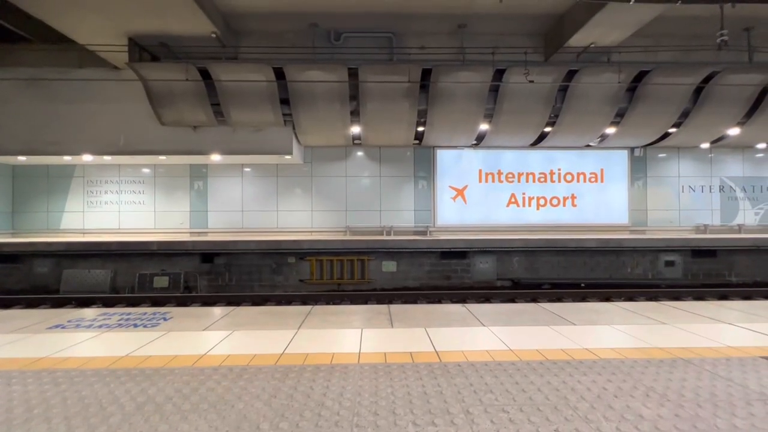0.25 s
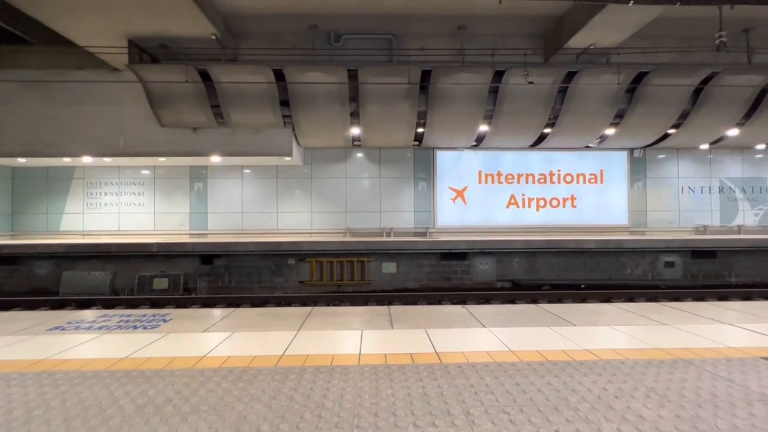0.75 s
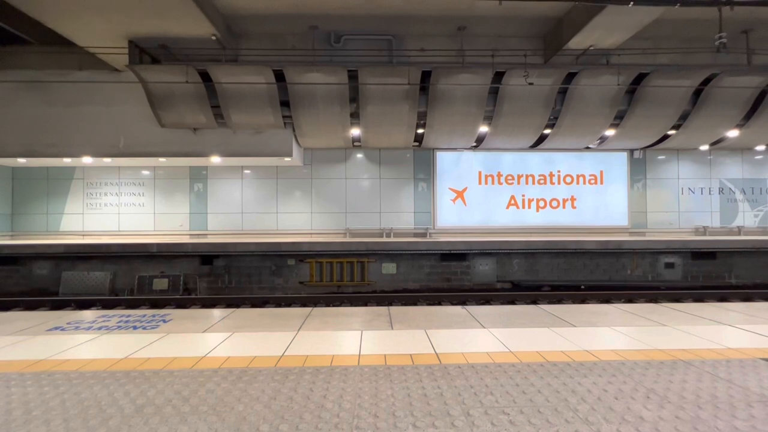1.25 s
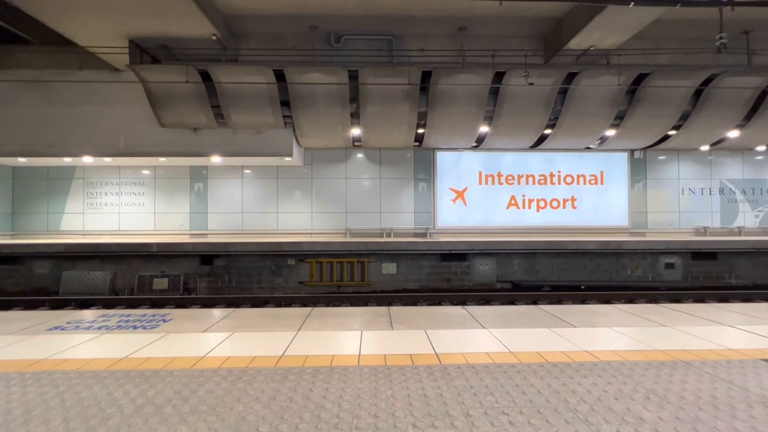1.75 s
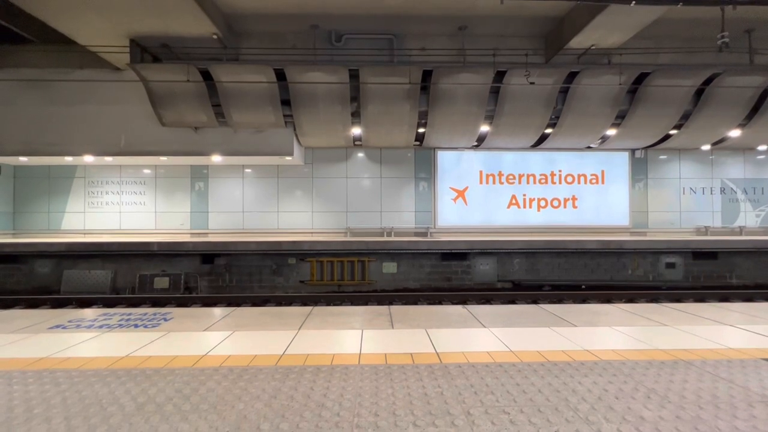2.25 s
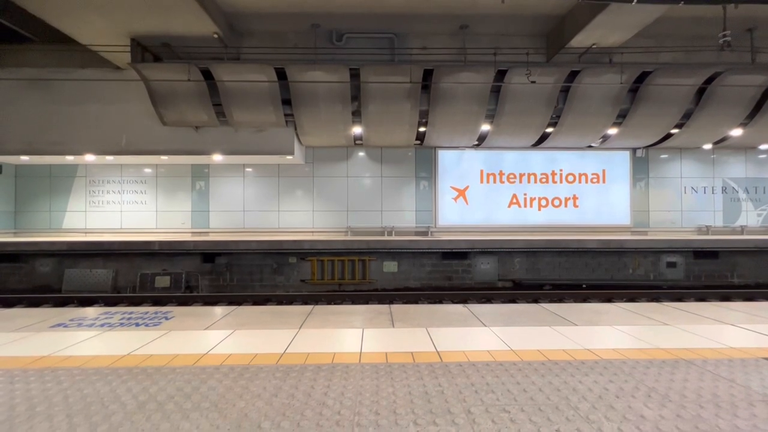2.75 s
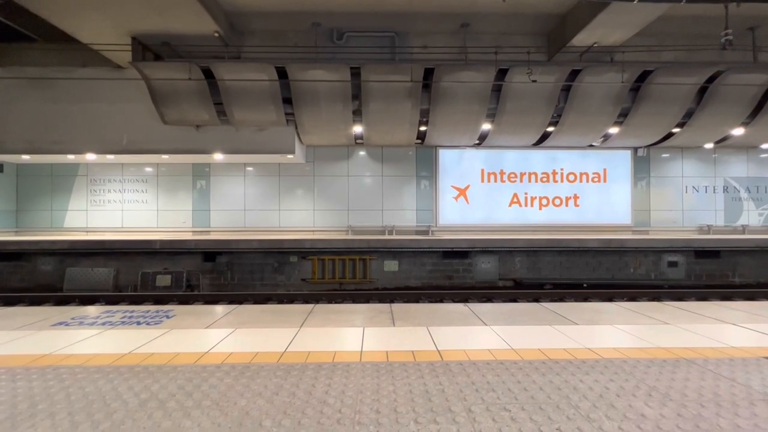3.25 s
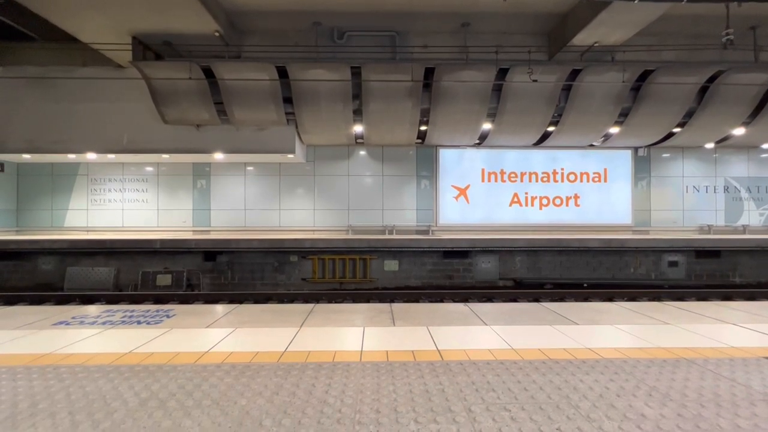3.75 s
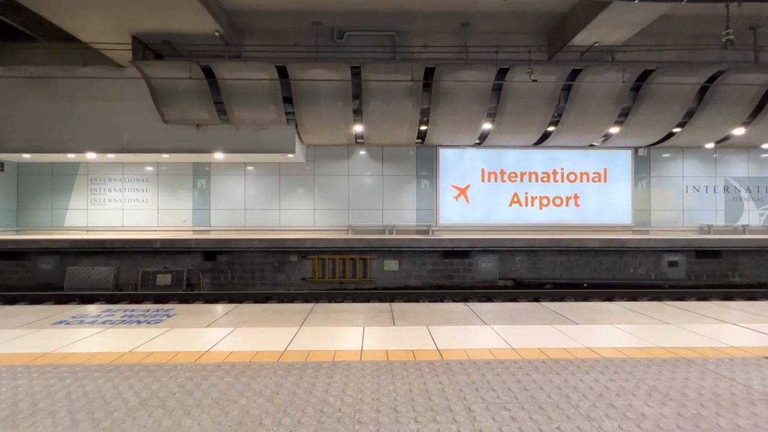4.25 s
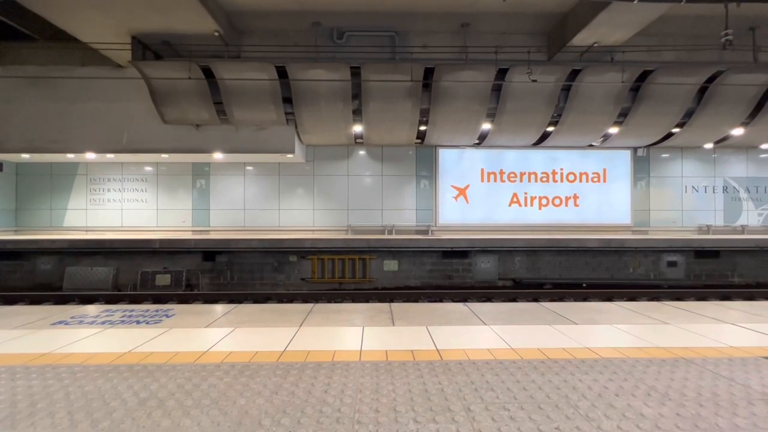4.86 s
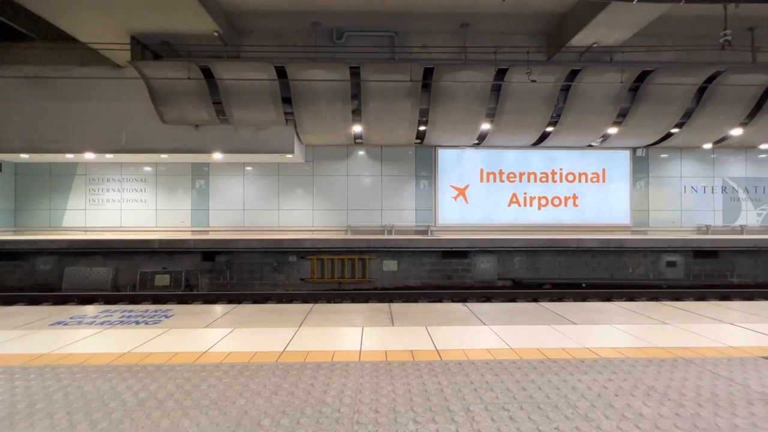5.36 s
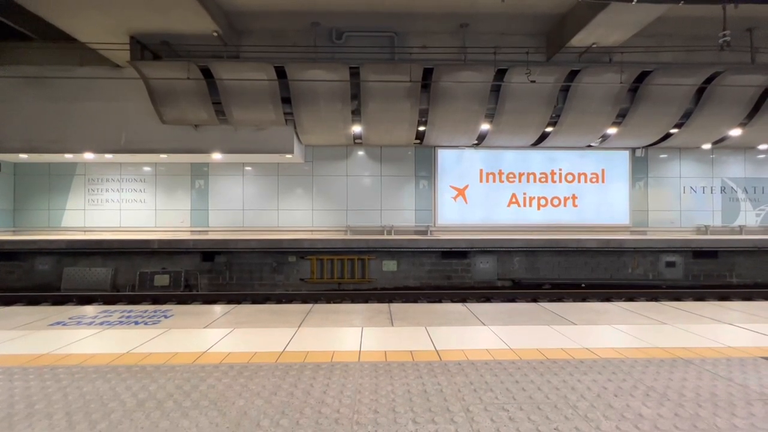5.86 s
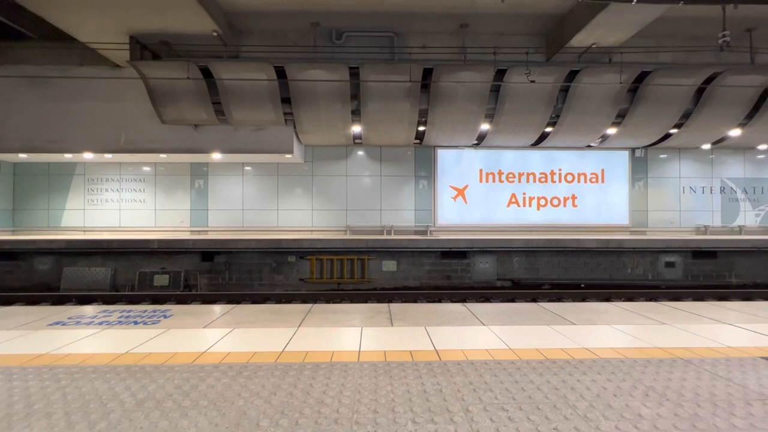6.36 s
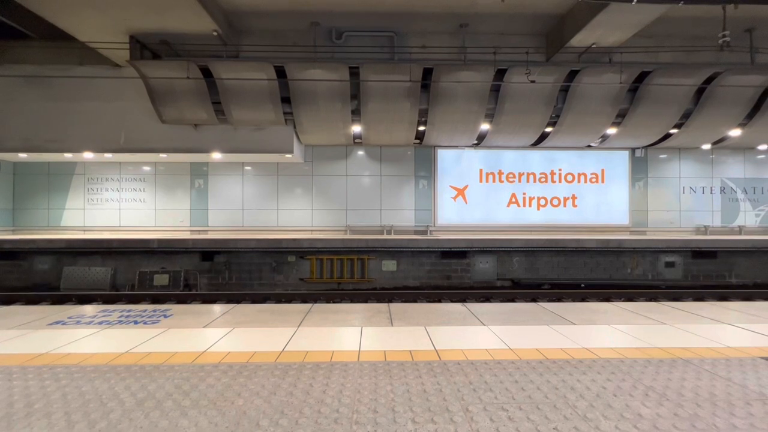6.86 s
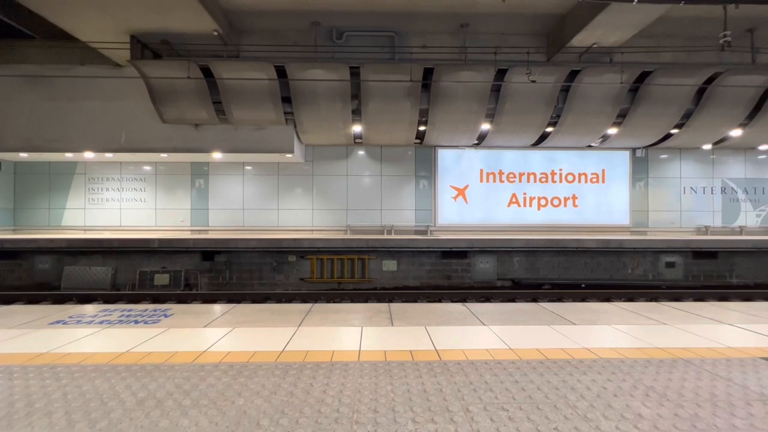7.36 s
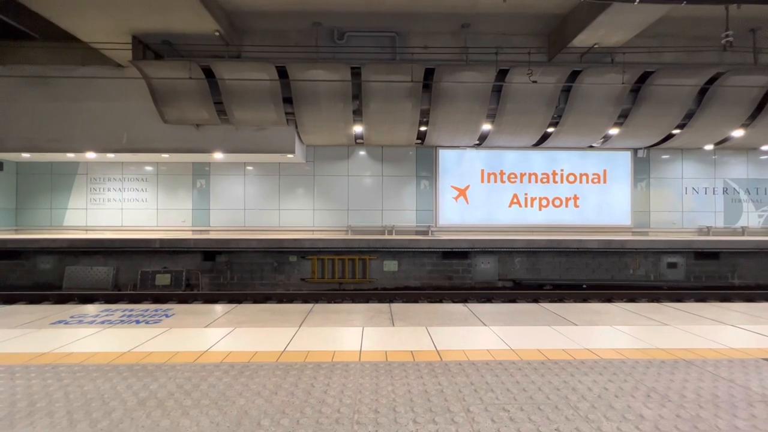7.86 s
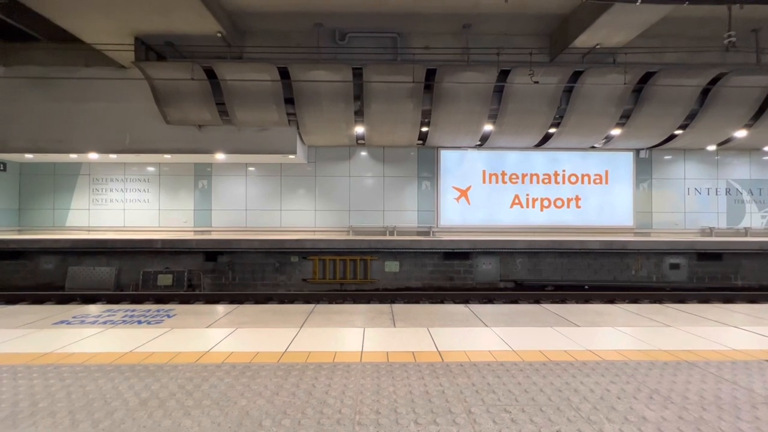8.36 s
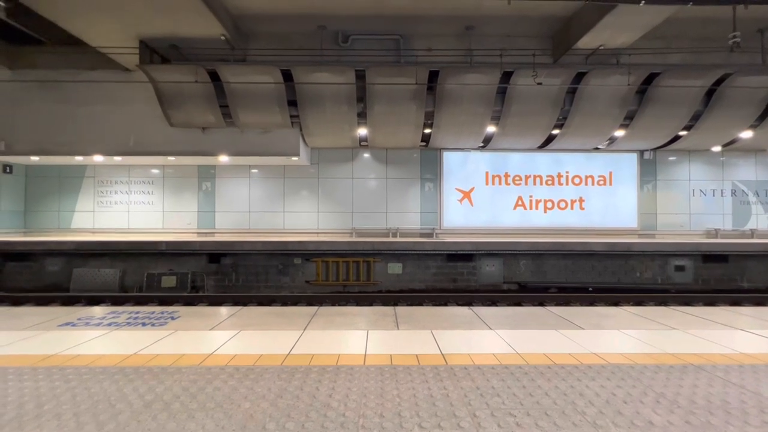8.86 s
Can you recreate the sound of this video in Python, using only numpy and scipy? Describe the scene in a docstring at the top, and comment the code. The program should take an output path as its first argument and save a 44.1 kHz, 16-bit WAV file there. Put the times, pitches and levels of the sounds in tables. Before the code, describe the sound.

Low tunnel rumble and a wavering electric gear hum approach from the left, slowly dropping in pitch. Metallic rail ringing is strongest at first, then fades under wide brake hiss and a very high, thin whistle from the right. Gusts knock the left side of a phone stereo microphone. The hiss drops after six seconds while the rolling roar keeps growing, with short wheel rings near the end; the train never arrives.

```python
"""Train braking towards an underground platform

An electric train, still out of sight in the tunnel, slows: rolling tones sink with wheel speed and a
gear drone sinks in steps. Rail modes and high rail song run ahead of it as filtered noise, and brakes hiss.
The air it pushes buffets the left port of a phone-sized microphone pair; rumble and station hum lie below."""
import sys
import numpy as np
from scipy import signal
from scipy.fft import rfft, irfft
from scipy.io import wavfile
from scipy.ndimage import uniform_filter1d

SR = 44100
rng = np.random.default_rng(int(sys.argv[2]) if len(sys.argv) > 2 else 0)


def voltage_ratio(level):
    """Linear amplitude factor for a level in decibels (scalar or array-like)."""
    return 10 ** (np.asarray(level, float) / 20)


def dump_mix(stems):
    """Bounce the given channels to the path in sys.argv[1] as a 16-bit WAV at rate SR."""
    frames = np.atleast_2d(stems).T  # one column per channel
    limited = np.clip(frames, -1, 1)  # hard clip at full scale
    pcm = np.round(limited * 32767).astype(np.int16)
    wavfile.write(sys.argv[1], SR, pcm)


N = 401751  # samples

SIZE, HOP = 4096, 1024  # spectral frame and its step, samples
HZ = np.fft.rfftfreq(SIZE, 1 / SR)[:, None]  # bin frequencies
T = np.arange(N // HOP + 5) * HOP / SR  # frame times, s
SAMPLES = np.arange(N) / SR  # sample times, s
GAP_S, EASE_S = 4.09, 5.99  # the hiss dips briefly; the brakes ease

# Tones of wheel on rail roughness. Each row: pitch in Hz and width in Hz, both at speed factor 1,
# relative level in dB at tone weight 0, relative level in dB at tone weight 1.
ROLLING_TONES = [(179, 12, -29, 6), (342, 28, -21, 6.5), (367, 16.5, -10, 8), (504, 54, -21, -7),
                 (743, 38, -15, -6.5), (1064, 59, -21, -7.5), (1436, 32, -22, -15), (1823, 100, -32, -15.5),
                 (2146, 114, -35, -14)]
# Broad roar under the tones. Each row: frequency in Hz, relative level in dB.
ROAR_SPECTRUM = [(60, -51), (150, -19), (400, -11), (600, -18.5), (1200, -23), (2300, -29.5), (2700, -36.5),
                 (5000, -42), (8000, -73)]
# Bursts in which a wheel rings out of the roar. Each row: start in seconds, hold in seconds,
# pitch in Hz, lift in dB.
WHEEL_RINGS = [(7.97, .08, 2170, 6), (8.225, .05, 1840, 14), (8.397, 0.054, 1820, 7),
               (8.522, 0.22, 2100, 6), (8.54, 0.15, 1810, 4.5), (8.824, 0.16, 2100, 7),
               (8.85, 0.099, 1780, 8)]
# Course of the rolling sound. Each row: time in seconds, tone weight from 0 to 1, going up and down,
# level of the rolling roar in dB.
ROLLING_COURSE = [(0, 0.3, -47), (1.2, 0.14, -45.5), (2.5, 0.4, -45), (3.3, 0.45, -41), (4.3, .65, -39.5),
                  (4.9, 0.34, -45.5), (5.4, 0.85, -39.5), (6.2, 0.55, -40.5), (6.5, 1, -36.5),
                  (7.5, 0.79, -35.5), (8.25, 0.82, -31.5), (8.5, 0.95, -27.5), (9.11, 0.73, -30.5)]


def rolling():
    """Roughness excitation: tone pitch is proportional to wheel speed, which falls under steady braking."""
    start_speed, slowing_per_s = 1.32, 0.0381  # speed factor
    wander, flutter_db = 0.007, 1.5  # rms pitch wander as a share, rms strength wander
    speed = start_speed - slowing_per_s * T
    weight = over_time(ROLLING_COURSE)[0]
    power = voltage_ratio(over_hz(ROAR_SPECTRUM)) ** 2
    drift, flutter = slow_wander(len(ROLLING_TONES), 7)
    for (hz, width, db_at_0, db_at_1), off, up in zip(ROLLING_TONES, drift, flutter):
        db = db_at_0 + (db_at_1 - db_at_0) * weight + flutter_db * up
        pitch = hz * speed * (1 + wander * off)
        power = power + (voltage_ratio(db) * peak(pitch, width * speed)) ** 2
    ringing_db = 0
    for s, hold, hz, db in WHEEL_RINGS:
        ringing_db = ringing_db + swells([(s, hold, db)], 0.03, 0.034, T) * peak(hz, 190)
    return from_tunnel(np.sqrt(power) * voltage_ratio(ringing_db), roar_db(), patchy_db=1.5)


def roar_db():
    """Linear interpolation in decibels: level of the rolling roar at every sample."""
    return over_time(ROLLING_COURSE, SAMPLES)[1]


def drone_pitch(t):
    """Gear meshing: the pitch in Hz stays high, sinks, holds, then sinks again."""
    start_hz, held_hz, early_sag_hz_per_s, late_sag_hz_per_s = 340.1, 296.5, 45, 7.6
    hold_from_s, sink_again_s = 2.4, 4.5
    early = np.clip(held_hz + early_sag_hz_per_s * (hold_from_s - t), held_hz, start_hz)
    return early - late_sag_hz_per_s * np.maximum(t - sink_again_s, 0)


# Wavering of the drone level. Each row: start in seconds, hold in seconds, lift in dB.
DRONE_LIFTS = [(.6, 0.39, 6.5), (1.37, 0.058, 7.5), (3.2, 0.14, 11.5), (4.0, 0.07, 9), (4.21, 0.12, 13.5),
               (4.56, 0.032, 11), (5.3, 0.12, 8), (5.87, 0.044, 13.5), (6.36, 0.052, 9.5), (6.55, .22, 6.5),
               (7.15, 0.29, 7), (7.6, 0.33, 9), (8.15, 0.29, 8.5), (8.95, .2, 9.5)]


def gear():
    """Phase integration: a traction gear tone, mixed with a smeared band of noise at the same pitch."""
    under_roar_db, smeared_width_hz, waver_hz = -8, 23.6, 2.52
    clears_s, clear_takes_s = 7.2, 0.85
    level_db = roar_db() + under_roar_db + swells(DRONE_LIFTS, 0.083, 0.12, SAMPLES)
    waver = rng.standard_normal(N)
    for _ in range(2):
        waver = uniform_filter1d(waver, size=5000)
    phase = 2 * np.pi * np.cumsum(drone_pitch(SAMPLES) + waver_hz * evened(waver)) / SR
    # the left port leads by 1.32 rad
    tone = np.array([np.sin(phase + 1.32), np.sin(phase)]) * 2 * voltage_ratio(level_db)
    smeared = from_tunnel(peak(drone_pitch(T), smeared_width_hz), level_db, patchy_db=0.1)
    # weight of the clear tone, rising late from 0.24 to 0.53
    clear = 0.24 + 0.29 * np.clip((SAMPLES - clears_s) / clear_takes_s, 0, 1)
    return np.sqrt(1 - clear) * smeared + np.sqrt(clear) * tone


# Bending modes of the rail. Each row: centre pitch in Hz, width in Hz, relative level in dB when far,
# relative level in dB when near.
RAIL_MODES = [(1310, 40, -6, -14), (1385, 45, -1, -8), (1490, 50, -4, -10), (1550, 45, 1, -7),
              (1810, 150, -14, -6), (2110, 260, -8, -2), (2340, 110, -1, -6), (2440, 110, -7, -10)]
# Swells of the rail vibration. Each row: start in seconds, hold in seconds, lift in dB.
RAIL_LIFTS = [(2.6, 0.87, 1.2), (4.0, 0.7, 3.4), (5.3, 1.14, 1.4), (8.5, 0.22, 4.5)]


def rail():
    """Modal resonance: the rail carries vibration ahead of the train and rings near fixed pitches."""
    steady_db, rise_db, settle_s = -42, 21, 1.47
    shift_s, shift_takes_s = 4.4, 5.4  # the modes change weight as the wheels come close
    wander, flutter_db = 0.008, 2.4  # rms pitch wander as a share, rms strength wander
    near = np.clip((T - shift_s) / shift_takes_s, 0, 1)
    drift, flutter = slow_wander(len(RAIL_MODES), 9)
    power = 0
    for (hz, width, far_db, near_db), off, up in zip(RAIL_MODES, drift, flutter):
        db = far_db + (near_db - far_db) * near + flutter_db * up
        power = power + (voltage_ratio(db) * peak(hz * (1 + wander * off), width)) ** 2
    level_db = steady_db - rise_db * np.exp(-SAMPLES / settle_s)
    level_db = level_db + swells(RAIL_LIFTS, 0.25, 0.5, SAMPLES)
    return from_tunnel(np.sqrt(power), level_db, patchy_db=2.0)


# High singing of the rail. Each row: frequency in Hz, relative level in dB.
SONG_SPECTRUM = [(7400, -25), (7900, -7), (8300, 2.5), (8700, 2), (9300, -10.5), (9800, -22), (10200, -8.5),
                 (10550, -19.5), (11050, -16.5), (11600, -14.5), (13000, -10), (14000, -11.5), (14700, -18),
                 (15700, -11), (15800, -52)]
# Thin whistles in the song. Each row: pitch in Hz, width in Hz, relative level in dB.
SONG_WHISTLES = [(8025, 8, 7), (8051, 8, 8), (8273, 12, 7), (8387, 18, 5), (8456, 10, 4), (8643, 40, 1)]


def singing():
    """Narrow-band resonance: rail song, and whistles that come and go, from the right: the left port is late."""
    start_db, growth_db_per_s = -46, 3
    sag_from_db, sag_db_per_s = -31, 0.34  # sagging line, counted from time 0
    whistles = sum((voltage_ratio(db) * peak(hz, width)) ** 2 for hz, width, db in SONG_WHISTLES)
    come_and_go = voltage_ratio(3.0 * patches(3, 30))
    gain = np.sqrt(voltage_ratio(over_hz(SONG_SPECTRUM)) ** 2 + whistles * come_and_go)
    level_db = np.minimum(start_db + growth_db_per_s * SAMPLES, sag_from_db - sag_db_per_s * SAMPLES)
    # a slight extra rise that ends just before the brakes ease
    extra = np.clip((SAMPLES - GAP_S) / (EASE_S - GAP_S), 0, 1) * (SAMPLES < EASE_S - 0.25)
    return heard(gain, level_db + 1.7 * extra, -0.000275, 1.8, patchy_db=1.25)


# Brake hiss. Each row: frequency in Hz, relative level in dB.
HISS_SPECTRUM = [(500, 2), (1500, -7), (2500, 2.5), (4000, -1), (6000, -1), (7500, -2), (9000, -33.5)]
# Two humps of the hiss, the lower first. Each row: centre in Hz, width in Hz.
HISS_HUMPS = [(5000, 1700), (7000, 3400)]
# Swells of the lower hump. Each row: start in seconds, hold in seconds, lift in dB.
BRAKE_BITES = [(3.04, .05, 4.5), (4.2, 0.069, 4), (5.8, 0.2, 7)]


def hiss_level_db():
    """Piecewise-linear envelope: the hiss grows until the brakes ease, drops, steps down, creeps up."""
    quiet_db, top_db, growth_db_per_s, ease_db_per_s = -52, -30.5, 4, 23
    held_db, step_s, step_db, creep_db_per_s = -33, 6.97, -2.5, 2
    late = SAMPLES - EASE_S
    growing = np.maximum(top_db + growth_db_per_s * late, quiet_db)
    held = held_db + (SAMPLES > step_s) * (step_db + creep_db_per_s * (SAMPLES - step_s))
    eased = np.maximum(top_db - ease_db_per_s * late, uniform_filter1d(held, size=3000))
    gap_db = swells([(GAP_S, 0, -6.5)], 0.23, 0.077, SAMPLES)
    return np.where(late < 0, growing, eased) + gap_db


def hiss():
    """Friction noise: wide hiss whose lower hump swells as the brakes bite; the upper brightens, then dulls."""
    bright_s, bright_db, brighten_db_per_s, dull_db_per_s = 4.63, 5.5, 2, 2.5
    dull_eased_db = -3.5
    upper_db = bright_db + np.minimum(brighten_db_per_s * (T - bright_s), dull_db_per_s * (bright_s - T))
    upper_db = upper_db + dull_eased_db * np.clip((T - EASE_S) / 0.3, 0, 1)
    lower_db = swells(BRAKE_BITES, 0.52, 0.34, T)
    gap_db = swells([(GAP_S, 0, -4.5)], 0.37, 0.04, T)
    colour_db = over_hz(HISS_SPECTRUM)
    for lift_db, (hz, width) in zip((lower_db, upper_db), HISS_HUMPS):
        colour_db = colour_db + (lift_db + gap_db) * peak(hz, width)
    return heard(voltage_ratio(colour_db), hiss_level_db(), 0.000452, 0.81, patchy_db=1.23)


# Turbulence at the ports. Each row: frequency in Hz, relative level in dB.
WIND_SPECTRUM = [(33, -21), (50, 0.5), (80, 1), (150, -4.5), (320, -9), (600, -24.5), (1200, -40.5)]
# Gusts over the breeze. Each row: start in seconds, hold in seconds, lift in dB.
WIND_GUSTS = [(.62, 0.51, 4.5), (1.36, 0.21, 8.5), (1.82, 0.05, 9), (2.1, .25, 3.5), (2.54, 0.061, 9),
              (3.9, 0.18, 7.5), (4.25, 0.1, 14), (4.52, 0.14, 15), (4.81, 0.048, 8), (5.6, 0.08, 9),
              (6.9, 0.029, 13), (7.13, 0.12, 9), (7.43, 0.13, 13.5), (8.22, .05, 6)]
# Single buffets on the left port. Each row: time in seconds, peak in dB, pitch in Hz at that time,
# push 1 or pull -1.
PORT_BUFFETS = [(0.754, -21, 182, 1), (.847, -16.5, 208, -1), (1.113, -21, 125, 1), (1.311, -23, 130, 1),
                (1.364, -22, 204, 1), (1.523, -16.5, 240, 1), (1.562, -17, 150, 1), (1.753, -20, 194, 1),
                (1.87, -18.5, 230, 1), (1.916, -26, 100, -1), (2.037, -26, 110, -1), (2.208, -26, 110, -1),
                (2.313, -22.5, 228, -1), (2.538, -22, 218, 1), (2.607, -25, 298, -1), (4.27, -18.5, 187, 1),
                (4.402, -16, 252, -1), (4.545, -19, 196, -1), (4.639, -14.5, 186, -1),
                (4.811, -22, 165, -1), (5.641, -21, 167, -1), (7.462, -18, 197, 1), (7.49, -12, 254, -1)]


def wind():
    """Turbulent pressure: lumpy low noise and kicks at the left port; the sheltered right gets a little."""
    breeze_db = -40.5
    colour = voltage_ratio(over_hz(WIND_SPECTRUM, np.fft.rfftfreq(N, 1 / SR)))
    noise = rng.standard_normal((N, 4)).T
    slow = uniform_filter1d(uniform_filter1d(noise[2:], 350), 350)
    turbulence = evened(irfft(rfft(noise[:2]) * colour, N) * voltage_ratio(2.75 * evened(slow)))
    left, right = turbulence * voltage_ratio(breeze_db + swells(WIND_GUSTS, 0.11, 0.092, SAMPLES))
    u = np.arange(-400, 1200) / SR  # seconds from the buffet's peak
    for s, db, hz, sign in PORT_BUFFETS:
        # a sudden pressure kick, then a few slowing swings that die away
        envelope = np.exp(-(u * hz / np.where(u < 0, 0.24, 1.2)) ** 2)
        kick = np.cos(2 * np.pi * hz * u * (1 - 24 * u)) * envelope
        left[round(s * SR) - 400:][:len(u)] += np.sign(sign) * voltage_ratio(db) * kick
    return np.array([left, voltage_ratio(-8.5) * right + voltage_ratio(-18.5) * np.roll(left, 90)])


# Ground rumble through the tunnel walls. Each row: frequency in Hz, relative level in dB.
RUMBLE_SPECTRUM = [(35, -30), (70, -8.5), (110, -4.5), (150, 2.5), (210, -2), (260, -4), (400, -41.5)]
# Surges of the rumble. Each row: start in seconds, hold in seconds, lift in dB.
RUMBLE_SURGES = [(0, 0.45, 5), (3.7, 0.42, 8), (6.4, 0.98, 5), (8.8, .03, 5)]


def ground():
    """Low-frequency transmission: rumble that follows the roar, and a scrape that widens around 550 Hz."""
    under_roar_db, scrape_db, scrape_depth_db = -5, -41, 31
    rumble_db = roar_db() + under_roar_db + swells(RUMBLE_SURGES, 0.18, 0.5, SAMPLES)
    rumble = from_tunnel(voltage_ratio(over_hz(RUMBLE_SPECTRUM)), rumble_db, patchy_db=1.5)
    lift_db = swells([(GAP_S - 0.07, 0.2, scrape_depth_db)], 0.11, 0.081, SAMPLES)
    width_hz = np.clip(500 + 3500 * (T - GAP_S + 0.093), 300, None)
    scrape = from_tunnel(peak(550, width_hz), scrape_db - scrape_depth_db + lift_db, patchy_db=3.0)
    return rumble + scrape


# Steady station machinery. Each row: pitch in Hz, width in Hz, level in dB.
STATION_HUMS = [(187, 24, -52.5), (952, 140, -58)]


def station():
    """Stationary band noise: two machinery hums, and a faint, patchy high hiss throughout."""
    hums = sum(from_tunnel(peak(hz, width), db, patchy_db=2.0) for hz, width, db in STATION_HUMS)
    high_band = peak(14400, 3500) * (HZ > 11300) * (HZ < 15750)
    return hums + heard(high_band, -53.0, -0.000265, 1.9, patchy_db=7.5)


def from_tunnel(gain, level_db, patchy_db):
    """Arrival-time difference: sound from the tunnel mouth on the left reaches the left port first."""
    return heard(gain, level_db, 0.00045, 0.69, patchy_db)


# The microphone port pair. Each row: frequency in Hz, left over right in dB, likeness from 0 to 1.
PORT_PAIR = [(40, 0, 0.9), (298, 0, 0.85), (500, 2, 0.9), (840, 5, 0.75), (1010, 6, 0.76), (1165, 3, 0.46),
             (1415, 7, 0), (2470, 4.5, 0.83), (2630, -3, 0.1), (2840, 6.5, 0.47), (3930, 10.5, 0.63),
             (3990, 1, 0.25), (4450, 10.5, 0.14), (5280, 12, 0.5), (5680, 6.5, 0.1), (7030, 13, 0.4),
             (7600, 7.5, 0.1), (7830, 3.5, 0), (9280, -0.5, 0.4), (9300, 0.5, 0.67), (16200, -1, 1)]


def heard(gain, level_db, lead_s, lead_rad, patchy_db):
    """Partial coherence: coloured noise at two ports, partly alike, the left early by lead_s."""
    hz, left_db, same = np.transpose(PORT_PAIR)
    left_db = np.interp(HZ, hz, left_db)
    same = np.clip(np.interp(HZ, hz, same), 0, 1)
    a, b, c, d = rng.standard_normal((len(T), len(HZ), 4)).T
    right = a + 1j * b
    lead = np.exp(1j * (2 * np.pi * HZ * lead_s + lead_rad))
    left = same * right * lead + np.sqrt(1 - same ** 2) * (c + 1j * d)
    gain = gain * np.ones(len(T))
    # equal power in every frame, before the patches
    gain = gain / np.linalg.norm(gain, axis=0) * voltage_ratio(patchy_db * patches(24, 2))
    spectra = np.array([left * voltage_ratio(left_db), right]) * gain
    pair = signal.istft(spectra, nperseg=SIZE, noverlap=SIZE - HOP)[1][:, :N]
    return pair / np.std(pair.mean(0)) * voltage_ratio(level_db)


def evened(x):
    """Root-mean-square normalisation: scales to rms 1."""
    return x / np.sqrt(np.mean(x ** 2) + 1e-20)


def over_time(rows, t=T):
    """Linear interpolation: every column of a curve table, read at the times t."""
    s, *columns = np.transpose(rows)
    return [np.interp(t, s, c) for c in columns]


def over_hz(points, at=HZ):
    """Logarithmic frequency scale: a spectrum table in dB, read at every bin."""
    hz, db = np.transpose(points)
    return np.interp(np.log(at + 1), np.log(hz + 1), db)


def peak(hz, width):
    """Resonance: gain of a steep peak, 1 at its centre and half at half a width away."""
    return 1 / (1 + (2 * (HZ - hz) / width) ** 2)


def patches(bins, frames):
    """Random-field smoothing: chance over frequency and time, rms 1."""
    field = rng.standard_normal((len(T), len(HZ))).T
    return evened(uniform_filter1d(uniform_filter1d(field, bins, axis=0), frames, axis=1))


def slow_wander(count, frames):
    """Low-pass noise: a pitch drift and a strength flutter for each of count resonances, rms 1 overall."""
    noise = rng.standard_normal((count, 2, len(T)))
    return evened(uniform_filter1d(noise, size=frames)).transpose(1, 0, 2)


def swells(rows, rise_s, fall_s, t):
    """Trapezoid envelope: lift in dB, with a straight rise before each start and fall after its hold."""
    lift_db = 0
    for s, hold, db in rows:
        shape = np.minimum(1 + (t - s) / rise_s, 1 + (s + hold - t) / fall_s)
        lift_db = lift_db + db * np.clip(shape, 0, 1)
    return lift_db


def scene():
    """Superposition: the sum of all sources at the platform."""
    return rolling() + gear() + ground() + rail() + singing() + hiss() + station() + wind()


def squelch(x, from_hz, under_db):
    """Spectral gating: drops treble bands of sum and difference while far under the loudest above 6.9 kHz."""
    z = signal.stft(np.array([x[0] + x[1], x[0] - x[1]]) / 2, nperseg=2048, noverlap=1536)[2]
    power = uniform_filter1d(abs(z[:, :1024]) ** 2, size=3, axis=2)
    bands = power.reshape(2, 128, 8, -1).mean(2)  # eight bins each
    high = (np.arange(128) * SR / 256 > from_hz)[:, None]
    loudest = uniform_filter1d(bands[:, 40:].max((0, 1)), size=8)
    kept = ~high | (bands > loudest * voltage_ratio(under_db) ** 2)
    z[:, :1024] *= np.repeat(kept, 8, axis=1)
    mid, side = signal.istft(z, nperseg=2048, noverlap=1536)[1][:, :N]
    return np.array([mid + side, mid - side])


def top_cut(x):
    """Nothing passes above the cut-off."""
    return signal.sosfilt(signal.butter(12, 17070, fs=SR, output="sos"), x)


def record(dry):
    """High-pass filtering and gating: the phone cuts the deepest bass, and weak treble bands drop out."""
    bass_cut = signal.butter(4, 38, "high", fs=SR, output="sos")
    mix = squelch(signal.sosfilt(bass_cut, dry), from_hz=9200, under_db=-20.5)
    return top_cut(mix)


dry = scene()
out = record(dry)
dump_mix(out)
```